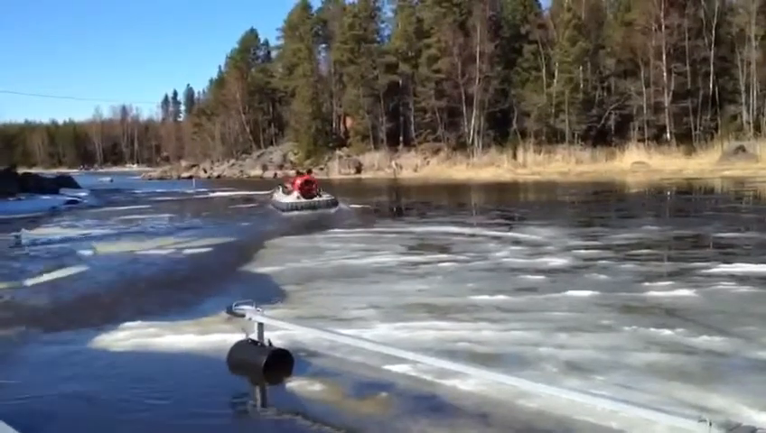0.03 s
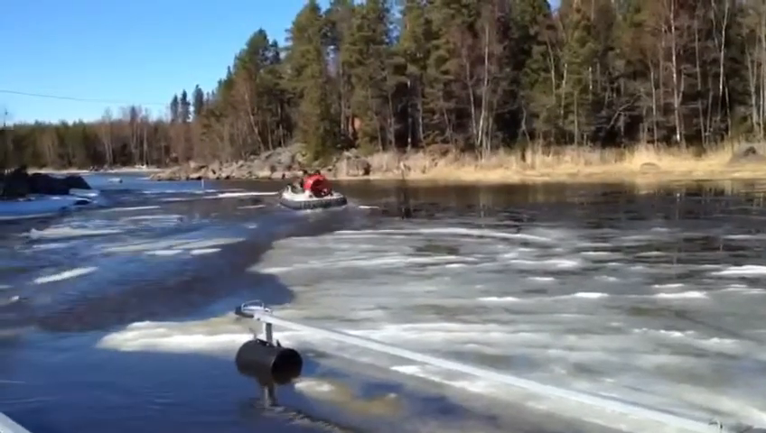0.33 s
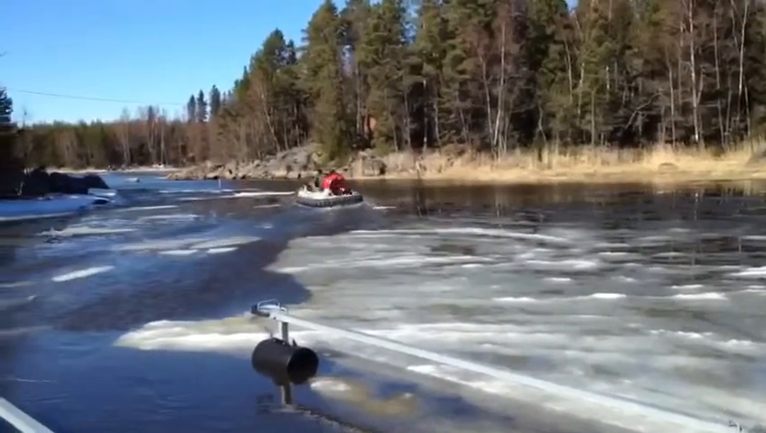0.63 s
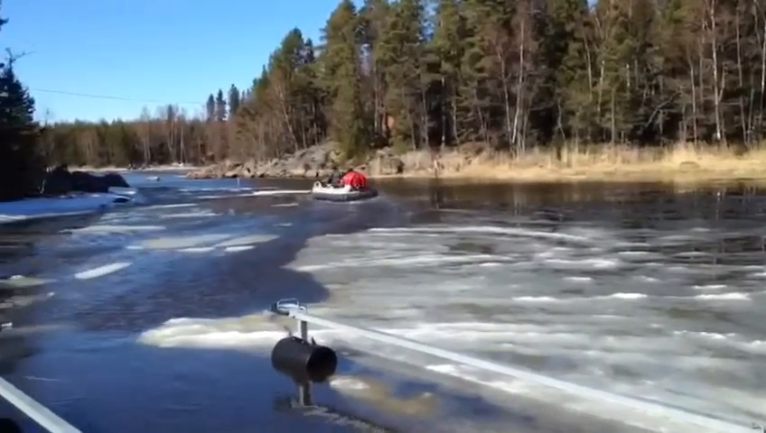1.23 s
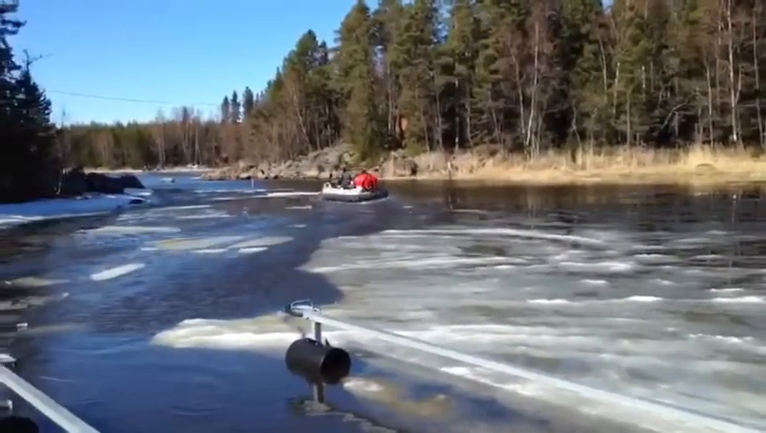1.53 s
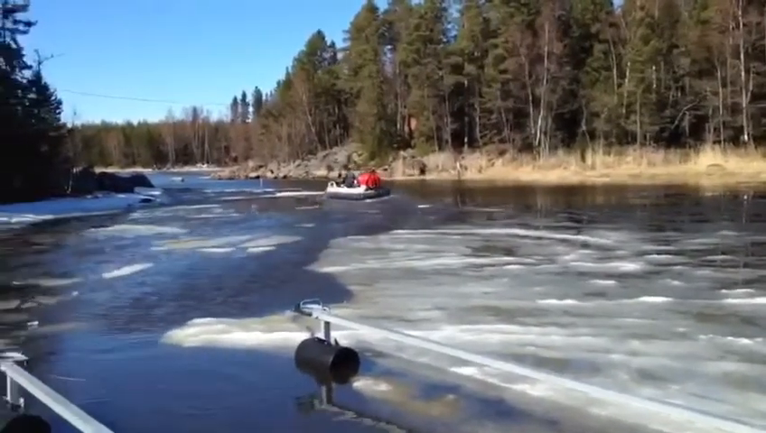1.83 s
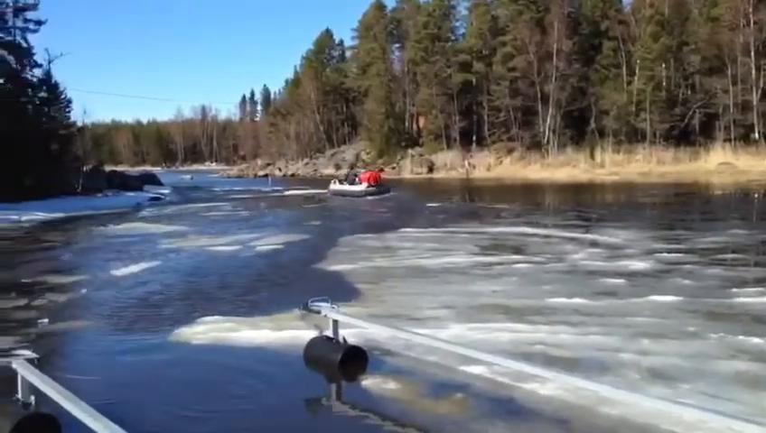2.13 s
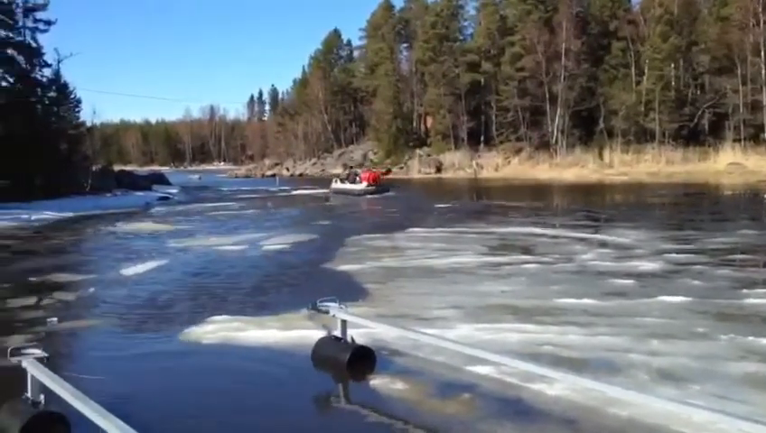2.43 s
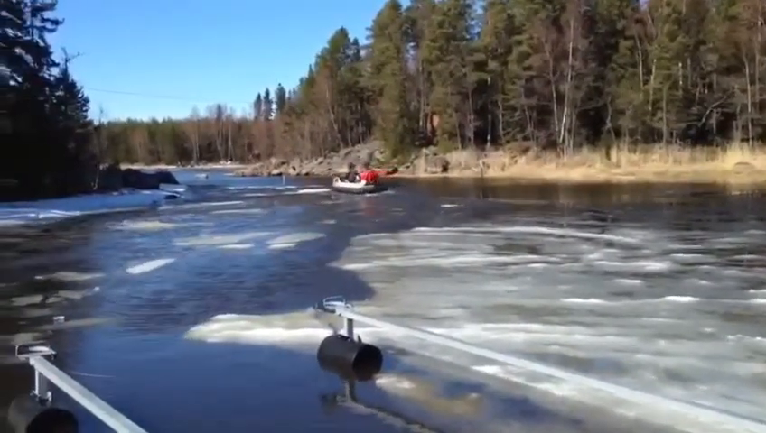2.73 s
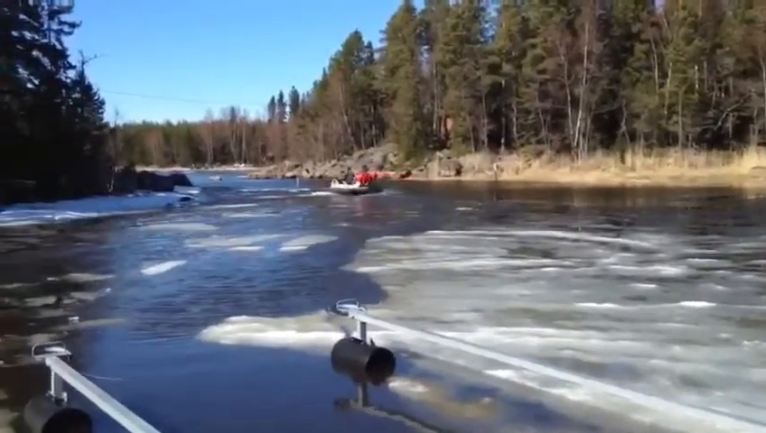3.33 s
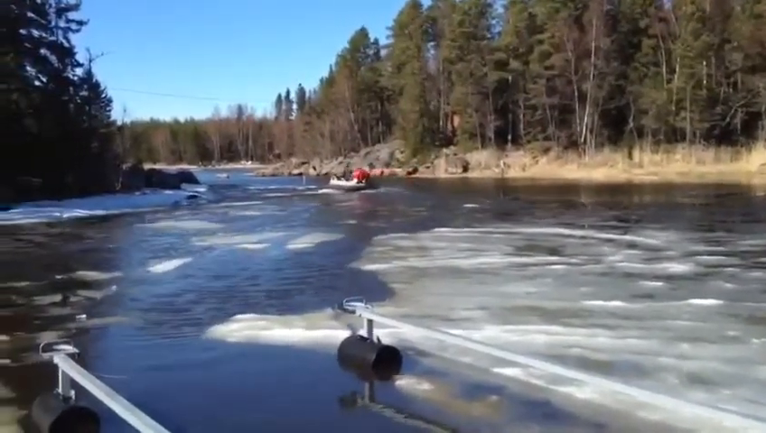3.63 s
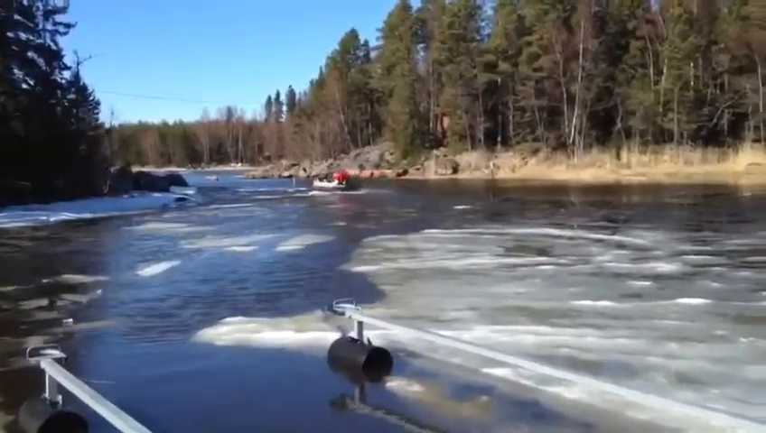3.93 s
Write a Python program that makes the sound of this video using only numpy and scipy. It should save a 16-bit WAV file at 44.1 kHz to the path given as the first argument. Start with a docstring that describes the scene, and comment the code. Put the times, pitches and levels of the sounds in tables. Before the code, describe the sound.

A distant hovercraft drones across a lake, its engine and fan rising, dipping once and rising again as the sound turns brighter and raspier. Water washes faintly, and a light breeze rumbles and thumps on the microphone.

```python
"""Hovercraft across a half-frozen lake

Far from the microphone a small hovercraft drones; its throttle rises, dips once and rises again.
The engine fires and rasps, the geared fan hums and rushes, both brighter as the craft turns.
The wooded shore echoes them and the air on the way makes them waver. Open water washes faintly
at the ice; close up, a breeze buffets and thumps the microphone."""
import sys
import numpy as np
from scipy import signal
from scipy.fft import rfft, irfft
from scipy.io import wavfile

SR = 44100
rng = np.random.default_rng(int(sys.argv[2]) if len(sys.argv) > 2 else 0)


def unload_audio(sound):
    """Save the sound as a 16-bit wav file, at the path given as the first command line argument."""
    columns = np.transpose(np.atleast_2d(sound))
    # keep every value between -1 and 1, then stretch to whole-number steps
    steps = np.round(np.clip(columns, -1, 1) * 32767)
    wavfile.write(sys.argv[1], SR, steps.astype(np.int16))


N = 176400
TIME_S = np.arange(N) / SR
BIN_HZ = np.maximum(np.arange(N // 2 + 1) * SR / N, 1)


def undb(db):
    """Decibels to gain."""
    return 10 ** (np.asarray(db) / 20)


def unit(x):
    """Scale to rms 1."""
    return x / np.sqrt(np.mean(x ** 2))


def curve(table, column=1):
    """One column of a table, joined by straight lines in time."""
    rows = np.array(table)
    return np.interp(TIME_S, rows[:, 0], rows[:, column])


def walk(rate_hz):
    """Smooth random motion with spread 1."""
    slow_s = np.arange(4096) / 512
    rolloff = 1 + (np.fft.rfftfreq(len(slow_s), slow_s[1]) / rate_hz) ** 4
    motion = unit(irfft(rfft(rng.standard_normal(len(slow_s))) / rolloff))
    return np.interp(TIME_S, slow_s, motion)


def noise(spectrum):
    """Noise of rms 1 with the given spectral shape."""
    hz, db = np.array(spectrum).T
    shape = undb(np.interp(np.log(BIN_HZ), np.log(hz), db))
    return unit(irfft(rfft(rng.standard_normal(N)) * shape, N))


def ring(x, modes):
    """Pass a sound through steep resonances."""
    response = sum(undb(db) / (1 + 1j * (BIN_HZ ** 2 - hz ** 2) / (BIN_HZ * width * np.sqrt(2))) ** 2
                   for hz, width, db in modes)
    return irfft(rfft(x) * response, N)


def tone(cycles, scatter, flutter_hz):
    """A distant partial of rms 1; moving air scatters its level and phase."""
    path = 1 + scatter * (walk(flutter_hz) + 1j * walk(flutter_hz))
    return unit(np.real(path * np.exp(2j * np.pi * (cycles + rng.random()))))


def turbulence(x, depth_db=1.3, rate_hz=22):
    """In turbulent air every third of an octave wavers in level by itself."""
    spectrum = rfft(x)
    octave = np.log2(BIN_HZ / 1000)
    bands = [np.maximum(1 - 3 * abs(octave - centre), 0) for centre in np.arange(-1, 4, 1 / 3)]
    return sum(irfft(spectrum * band, N) * undb(depth_db * walk(rate_hz)) for band in bands)


# Open water lapping at the ice: frequency_hz, density_db
WATER_SPECTRUM = [(200, -8), (600, -5.5), (1200, 5), (2000, 4), (3500, -29.5), (8000, -29.5)]

def water(level_db=-54, flicker_db=1.5):
    """Faint steady wash of the open water."""
    return noise(WATER_SPECTRUM) * undb(level_db + flicker_db * walk(20))


def shore(x, level_db=-15, t60_s=1, delay_s=.024):
    """Diffuse echo from the trees along the shore."""
    t = np.arange(SR) / SR
    onset = np.clip(t / delay_s - 1, 0, 1)
    tail = rng.standard_normal(SR) * undb(-60 * t / t60_s) * onset
    scattered = signal.sosfilt(signal.butter(3, 350, "high", fs=SR, output="sos"), x)
    return undb(level_db) * signal.fftconvolve(scattered, tail / np.linalg.norm(tail))[:N]


# Breeze and gust on the microphone: frequency_hz, density_db
BREEZE_SPECTRUM = [(20, -16.5), (35, -14), (58, 4), (80, -2), (170, 1), (250, -11), (330, -13.5),
                   (600, -22.5), (1500, -64)]
GUST_SPECTRUM = [(25, -17), (70, 1), (210, 0.5), (280, -8.5), (400, -7.5), (1200, -35), (6000, -68)]
# Strength of the breeze: time_s, level_db
BREEZE_LEVEL = [(0, -31), (.6, -33), (1.2, -29.5), (1.75, -32.5), (2.1, -29.5), (2.5, -29.5), (2.8, -32),
                (3.3, -32.5), (3.7, -32.5), (4, -38)]

def breeze(flicker_db=1.2, gust_s=3.756, gust_half_length_s=.16, gust_db=-26):
    """Wind rumbles right on the microphone, with one gust."""
    rumble = noise(BREEZE_SPECTRUM) * undb(curve(BREEZE_LEVEL) + flicker_db * walk(9.9))
    swell = undb(gust_db) * np.exp(-((TIME_S - gust_s) / gust_half_length_s) ** 2)
    return rumble + swell * noise(GUST_SPECTRUM)


# Thumps of wind: centre_s, pitch_hz, level_db
THUMPS = [(0.383, 115, -12.5), (0.415, 212, -12), (1.943, 520, -16.5)]

def thumps(half_length_cycles=.45):
    """Soft thumps at the microphone, each a pressure swing about one cycle long."""
    pressure = np.zeros(N)
    for centre_s, hz, db in THUMPS:
        cycles = (TIME_S - centre_s) * hz
        envelope = np.exp(-abs(cycles / half_length_cycles) ** 1.5)
        pressure -= undb(db) * envelope * np.cos(2 * np.pi * cycles)
    return pressure


# What faces the microphone as the craft turns, for air stream, fan and exhaust:
# time_s, exhaust_overtones_db, fan_overtones_db, low_rush_db, middle_rush_db
TURN_LEVELS = [(0, -16.5, -18, -46.5, -63), (.6, -12.5, -11, -49, -59.5), (1.15, -7.5, -6.5, -45.5, -62.5),
               (1.33, -5, -1.5, -35.5, -62), (1.77, -4, 1.5, -35.5, -55.5), (1.95, -7.5, 1.5, -34.5, -51.5),
               (2.1, -1, -0.5, -35.5, -54), (2.4, -2.5, 3, -33.5, -52), (3, 2, -4, -34, -47.5),
               (3.5, 1, 4, -33.5, -42), (4, 5, -11, -31.5, -40.5)]
# Middle and top of the air stream: frequency_hz, density_db
MIDDLE_RUSH_SPECTRUM = [(900, -12), (1700, -2.5), (2300, 0), (2900, 3), (3600, -1.5), (4200, -11),
                        (7000, -38.5)]
HISS_SPECTRUM = [(2500, -23), (3700, 1), (4100, -1.5), (4500, 4.5), (5400, 4), (7200, 2.5), (8500, -2.5),
                 (9500, -17)]
# Strength of the top hiss: time_s, level_db
HISS_LEVEL = [(0, -64), (.74, -62.5), (.88, -67), (1.43, -56.5), (1.77, -55.5), (1.89, -48), (1.97, -47.5),
              (2.1, -52.5), (2.35, -52), (2.55, -48.5), (2.9, -52), (4, -47)]

def air_stream():
    """The craft's air stream rushes and hisses from across the lake."""
    rush = turbulence(noise(MIDDLE_RUSH_SPECTRUM)) * undb(curve(TURN_LEVELS, column=4))
    hiss = turbulence(noise(HISS_SPECTRUM)) * undb(curve(HISS_LEVEL))
    return rush + hiss


# Resonances that shape the engine's buzz: centre_hz, width_hz, gain_db
BUZZ_MODES = [(1560, 220, 0), (2500, 1300, -7), (4500, 1400, -18)]
# Strength of the buzz: time_s, level_db
BUZZ_LEVEL = [(0, -65), (1, -56), (1.7, -49), (2.4, -51), (4, -51)]
# Resonances that shape the two whines: centre_hz, width_hz
WHINE_MODES = [(3520, 150), (3760, 170)]
# Strength of the whines: time_s, lower_db, upper_db
WHINE_LEVELS = [(0, -66.5, -77.5), (1.3, -66, -66), (1.62, -59.5, -62), (1.76, -57, -55.5),
                (1.94, -53, -47.5), (2.1, -52.5, -54), (2.35, -52.5, -64), (2.88, -50, -49),
                (3.02, -66, -60), (3.2, -60, -52.5), (3.35, -59, -43), (3.64, -48.5, -53), (4, -54, -61)]

def whine(firings):
    """High engine partials glide through fixed resonances: a faint broad buzz and two sharp whines."""
    partials = sum(tone(k * firings, scatter=.45, flutter_hz=27) for k in range(10, 40))
    buzz = undb(curve(BUZZ_LEVEL)) * unit(ring(partials, BUZZ_MODES))
    whines = sum(undb(curve(WHINE_LEVELS, column)) * unit(ring(partials, [(hz, width, 0)]))
                 for column, (hz, width) in enumerate(WHINE_MODES, 1))
    return buzz + whines


# Resonances of the engine's metal: centre_hz, width_hz, gain_db
METAL_MODES = [(2830, 600, 8.5), (3622, 126, 14.5), (4460, 340, 7)]
# Strength of the rasp: time_s, level_db
RASP_LEVEL = [(0, -68), (1.1, -70.5), (1.9, -56.5), (2.2, -51.5), (2.8, -50.5), (3.4, -46), (4, -47.5)]

def rasp(firings, firing_hz, size_spread=.24, puff_gain=.75, flicker_db=1):
    """Each firing gives a sharp crack and a puff of gas that ring the metal of the engine."""
    size = np.exp(size_spread * rng.standard_normal(N // 100)[firings.astype(int)])
    offset_samples = (firings % 1 - .5) * SR / firing_hz  # the crack falls mid-cycle
    cracks = unit(np.sinc(offset_samples / 2) * np.exp(-(offset_samples / 10) ** 2)) * size
    cycles_since_crack = (firings - .5) % 1
    puffs = unit(np.exp(-cycles_since_crack / 1.2) * rng.standard_normal(N))
    metal = unit(ring(cracks + puff_gain * puffs, METAL_MODES))
    return metal * undb(curve(RASP_LEVEL) + flicker_db * walk(18))


# Strength of the blade tone: time_s, level_db
BLADE_LEVEL = [(0, -34), (.18, -30), (.55, -34), (1.1, -26), (1.3, -28.5), (1.43, -24.5), (2.02, -25.5),
               (2.22, -35), (2.62, -29), (2.95, -24), (3.2, -25), (3.67, -23), (3.73, -48), (3.86, -33.5),
               (3.96, -22.5)]
# Fan overtones: blade_rate_multiple, relative_db
FAN_OVERTONES = [(2, -39), (3, -45.5), (4, -53), (5, -56.5), (6, -57)]
# Low rush through the fan: frequency_hz, density_db
LOW_RUSH_SPECTRUM = [(100, -37), (170, 5), (260, 8.5), (340, -8.5), (480, 4.5), (720, 1), (1000, -3.5),
                     (1500, -12), (2200, -20), (4000, -61), (9000, -50.5)]

def fan(blade_passes, chop_depth=.3, flicker_db=1.5):
    """The far-off fan: the blade tone, its overtones and air chopped at the blade rate."""
    hum = undb(curve(BLADE_LEVEL)) * tone(blade_passes, scatter=.18, flutter_hz=6.1)
    overtones = sum(undb(db) * tone(round(k) * blade_passes, scatter=.28, flutter_hz=5.4)
                    for k, db in FAN_OVERTONES)
    chop = 1 + chop_depth * np.cos(2 * np.pi * blade_passes)
    rush = unit(noise(LOW_RUSH_SPECTRUM) * chop)
    rush *= undb(curve(TURN_LEVELS, column=3) + flicker_db * walk(14))
    return hum + undb(curve(TURN_LEVELS, column=2)) * overtones + rush


# Strength of the firing tone: time_s, level_db
FIRING_LEVEL = [(0, -23), (.05, -22.5), (.16, -35), (.34, -21), (.45, -28), (.55, -21), (.85, -24.5),
                (1.8, -23), (2.15, -25), (2.48, -22), (2.66, -20.5), (3.03, -27), (3.15, -23), (3.65, -25),
                (3.73, -33.5), (3.95, -29)]
# Upper exhaust overtones: firing_rate_multiple, relative_db
EXHAUST_OVERTONES = [(4, -41), (5, -40), (6, -54.5), (7, -52.5), (8, -57), (9, -57)]

def exhaust(firings, second_db=-37, third_db=-47.5):
    """The firing tone and its overtones carry over the ice; the upper ones grow as the craft turns."""
    drone = undb(curve(FIRING_LEVEL)) * tone(firings, scatter=.14, flutter_hz=17)
    body = sum(undb(db) * tone(k * firings, scatter=.79, flutter_hz=8.6)
               for k, db in ((2, second_db), (3, third_db)))
    upper = sum(undb(db) * tone(round(k) * firings, scatter=.28, flutter_hz=6.3)
                for k, db in EXHAUST_OVERTONES)
    return drone + body + undb(curve(TURN_LEVELS, column=1)) * upper


# Engine speed under the throttle: time_s, firing_hz
ENGINE_SPEED = [(0, 118.5), (.15, 116.8), (.3, 117.4), (.75, 126.3), (1.05, 126.1), (1.3, 129),
                (1.65, 132.6), (1.88, 136.9), (1.96, 137), (2.04, 131.3), (2.12, 124.6), (2.22, 120),
                (2.35, 118.4), (2.5, 120.3), (2.9, 134.4), (3.35, 134), (3.65, 136.6), (4, 133.8)]
BLADES_PER_FIRING = 1.716

def scene():
    """One microphone at the lake: the distant craft and its echo, the water, and wind close up."""
    firing_hz = curve(ENGINE_SPEED)
    firings = np.cumsum(firing_hz) / SR
    engine = exhaust(firings) + rasp(firings, firing_hz) + whine(firings)
    craft = engine + fan(BLADES_PER_FIRING * firings) + air_stream()
    return (craft + shore(craft) + water() + breeze() + thumps())[None]


def record(dry, top_hz=9300):
    """The recorder cuts the top steeply."""
    return signal.sosfilt(signal.ellip(10, .2, 80, top_hz, fs=SR, output="sos"), dry)


dry = scene()
out = record(dry)
unload_audio(out)
```